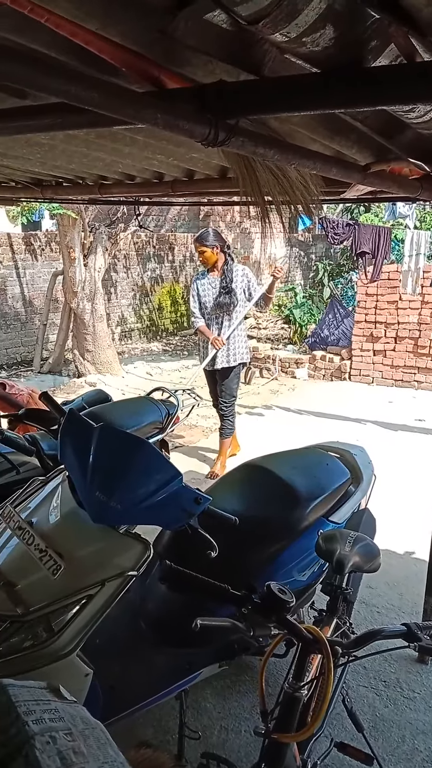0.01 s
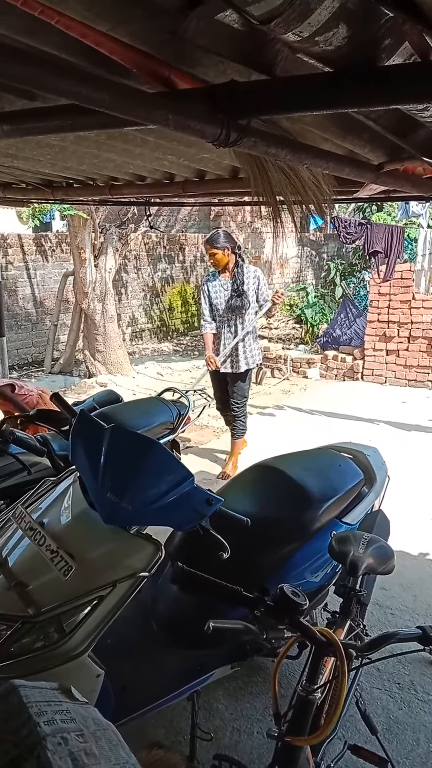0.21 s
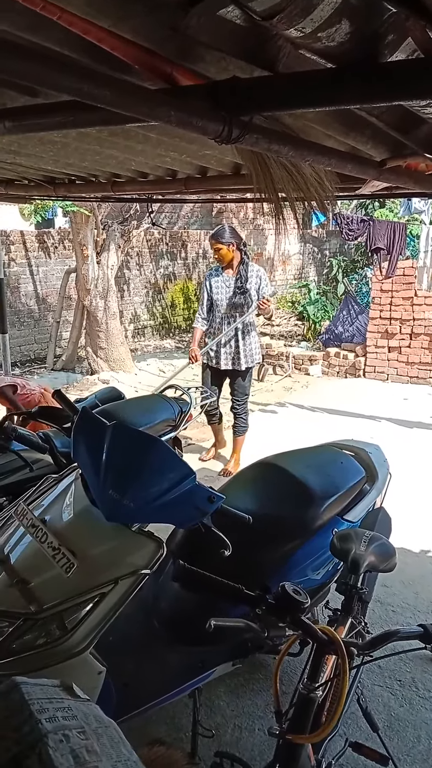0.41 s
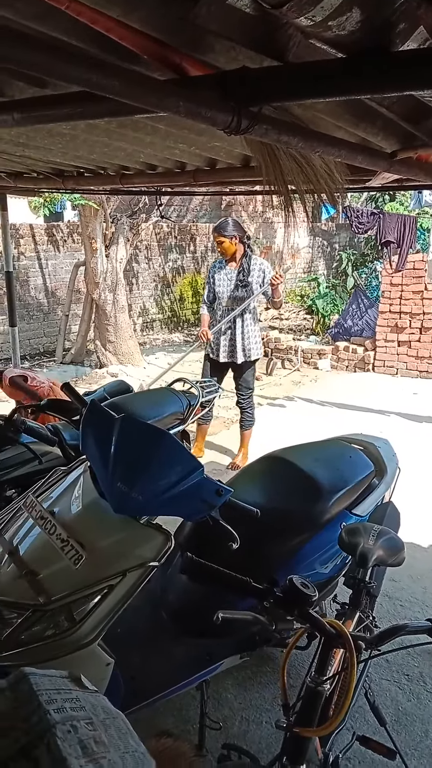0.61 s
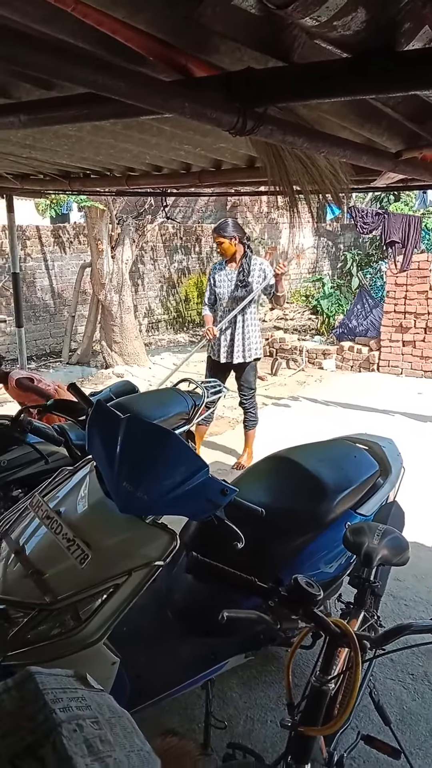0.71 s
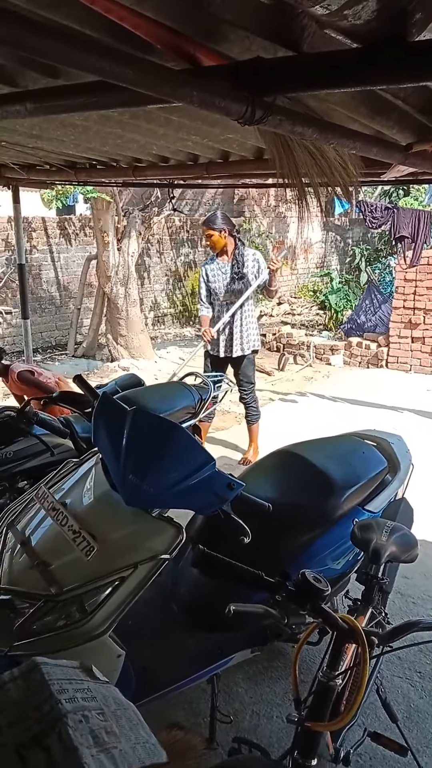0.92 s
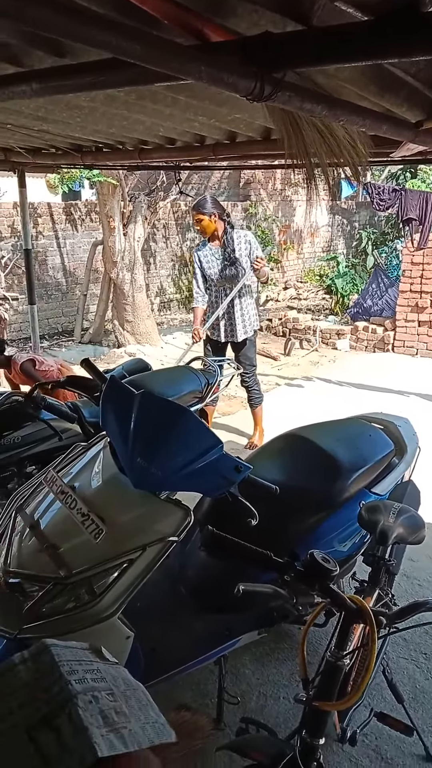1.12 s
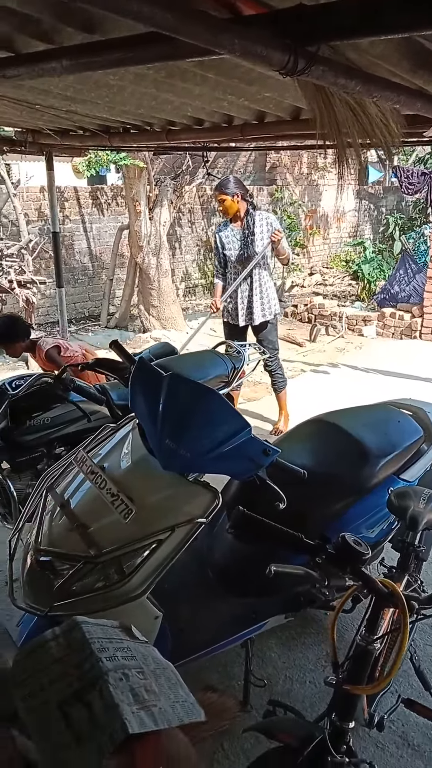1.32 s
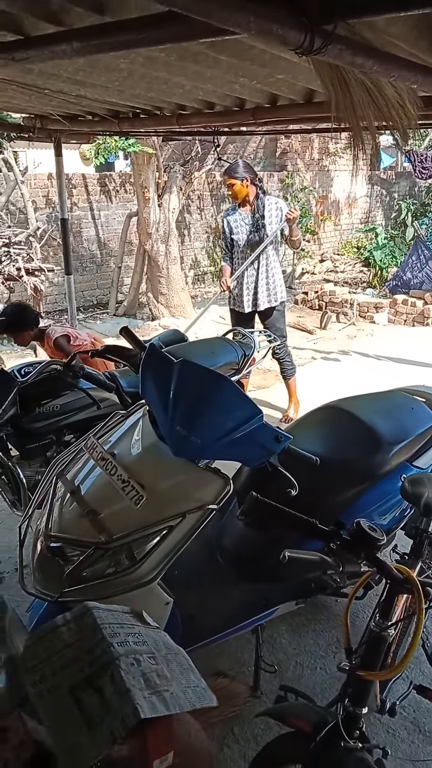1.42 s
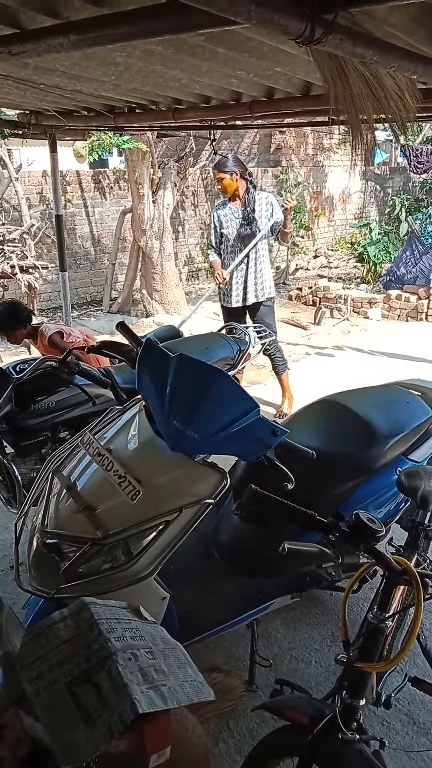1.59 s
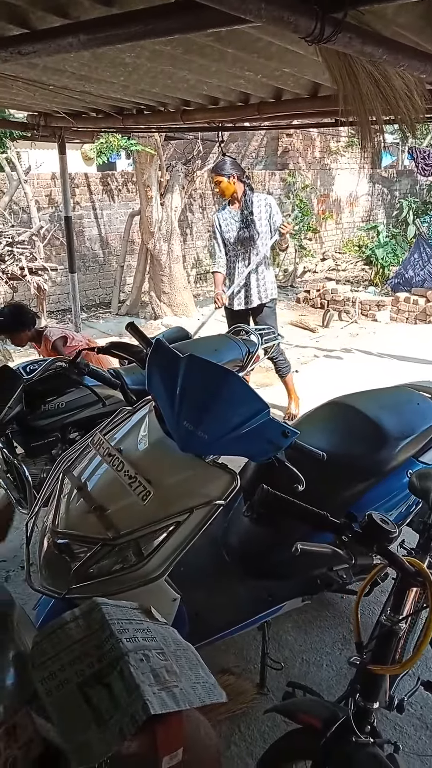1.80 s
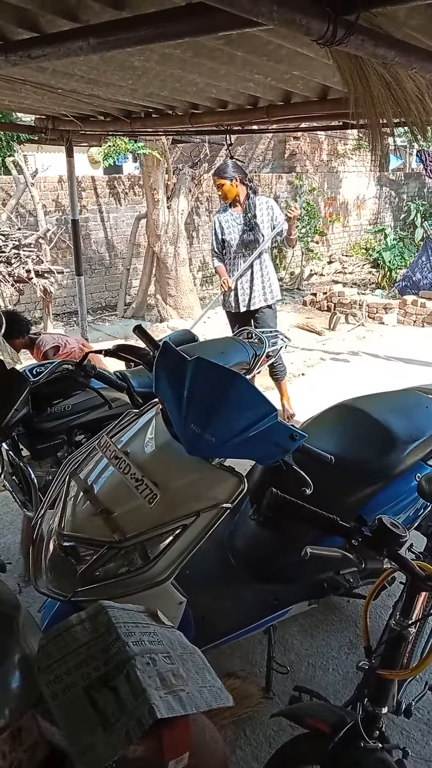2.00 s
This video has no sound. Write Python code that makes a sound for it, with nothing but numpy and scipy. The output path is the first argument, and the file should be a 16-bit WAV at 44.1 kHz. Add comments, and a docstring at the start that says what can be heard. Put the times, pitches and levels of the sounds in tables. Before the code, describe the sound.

Broom sweeping hard ground, two long harsh strokes and lighter brushes, a twig knock, birds chirping faintly.

```python
"""A low uneven rumble and quiet outdoor air, both shaped noise, lie under a stiff broom sweeping a paved yard.
Two faint whistles, a chirp's fading echoes, open it; a long stroke of bristle noise follows, and over it come
a bird's falling chirps and a farther one's hollow notes, all gliding tones. Lighter brushing, thin twitters of
other birds, a second long stroke with a brief hum, and a sharp twig knock come next; then more light brushing,
twitters and a second hum. Walls and a shed roof echo them."""
import sys
import numpy as np
from scipy import signal
from scipy.fft import rfft, irfft
from scipy.io import wavfile
from scipy.ndimage import uniform_filter1d

SR = 44100
rng = np.random.default_rng(int(sys.argv[2]) if len(sys.argv) > 2 else 0)


def transcribe(u):
    """Save the signal u as a 16-bit wav file named by the first command-line argument.

    u: samples, shape (n,) or (channels, n), limited to [-1, 1]; the rate is SR.
    q: integer samples, one column per channel.
    """
    v = np.clip(np.atleast_2d(u).T, -1, 1)
    q = np.round(v * 32767).astype(np.int16)
    wavfile.write(sys.argv[1], SR, q)


N = 88200
T = np.arange(N) / SR

# Spectra below hold pitch_hz, level_db per Hz; only their shape counts, as each noise is set to its own level.
# Level of the rumble over time: start_s, level_db
RUMBLE_LEVEL = [(0, -88), (.2, -83), (.25, -68.5), (.3, -69), (.335, -49), (.4, -65), (.46, -55),
                (.55, -63.5), (.77, -65), (1.0, -55.5), (1.08, -68), (1.14, -57.5), (1.33, -72.5),
                (1.39, -45.5), (1.44, -52), (1.51, -58.5), (1.66, -59), (1.75, -75), (1.82, -61),
                (2.0, -64.5)]
# Spectrum of the rumble: pitch_hz, level_db
RUMBLE_SPECTRUM = [(20, -68), (45, -17), (70, -8.5), (92, 2), (140, 2.5), (200, -14), (260, -29),
                   (500, -34.5), (1000, -78)]
# Spectrum of the outdoor air: pitch_hz, level_db
AIR_SPECTRUM = [(120, -6), (300, 4), (600, -4.5), (1400, 4.5), (2300, -12), (4000, -20), (9000, 3),
                (15500, -37)]
# Time the yard's echoes take to fall 60 dB: pitch_hz, decay_s
YARD_DECAY = [(200, 0.37), (1000, 0.21), (3000, 0.18), (6000, 0.15), (15000, .15)]
# Brief low hums: start_s, length_s, pitch_hz, level_db, octave_db (upper octave against the hum)
HUMS = [(1.205, 0.148, 203.8, -68, 4), (1.86, 0.15, 146.3, -61.5, -27)]
# Faint thin whistles: two fading echoes of an earlier chirp at the start, then twitters of other birds:
# start_s, length_s, first_hz, last_hz, peak_db
FAINT_WHISTLES = [(-.02, 0.047, 2530, 2410, -72.5), (-.02, 0.041, 3490, 3460, -71.5),
                  (0.746, 0.06, 4100, 4090, -65), (1.059, 0.048, 2390, 2230, -61.5),
                  (1.684, 0.057, 5320, 5550, -55), (1.722, 0.042, 5900, 5590, -56.5)]
# Hollow notes of the far bird and their weak after-pulses:
# start_s, length_s, pitch_hz, level_db, rise_s, dip_db (in the middle; negative swells)
HOLLOW_NOTES = [(0.416, 0.095, 698.5, -50, 0.026, 7), (0.511, 0.024, 656, -62, 0.015, -3),
                (0.584, 0.099, 693, -79, 0.046, 7), (0.958, 0.092, 696, -55, 0.067, 1.5),
                (1.485, 0.11, 695.6, -55, 0.022, 3.5), (1.589, 0.054, 698, -69.5, 0.0065, 5),
                (1.692, 0.064, 696, -69.5, 0.025, 1)]
# Falling chirps, a sagging whistle and then a louder drop:
# start_s, hold_s, drop_s, top_hz, knee_hz, end_hz, hold_peak_db, drop_peak_db
CHIRPS = [(.25, 0.079, 0.049, 3855, 3420, 3246, -51, -39),
          (0.802, 0.092, 0.04, 3738, 3230, 2576, -55.5, -49),
          (1.157, 0.14, 0.038, 4065, 3585, 2533, -50.5, -44),
          (1.661, .079, 0.039, 3946, 3614, 2696, -51.5, -43.5)]
# Knocks of a twig on the ground: start_s, peak_db
KNOCKS = [(1.4861, -24.5)]
# One table per broom stroke: time_s, hiss_db (bristles), scrape_db (lower scrape)
STROKES = [
    [(.1, -84, -96), (.125, -72.5, -96), (.145, -51, -72), (.18, -45.5, -59.5), (.24, -40, -50),
     (.31, -36, -49.5), (.345, -30, -45), (.41, -27.5, -42.5), (.5, -36, -45.5), (.58, -53, -61),
     (.66, -64, -77.5), (.71, -76.5, -107)],
    [(.828, -71, -86), (.841, -50.5, -77), (.885, -53, -62.5), (.915, -46, -62), (.945, -45.5, -63),
     (.988, -78, -87)],
    [(1.068, -65, -76), (1.086, -53.5, -64), (1.13, -45.5, -51.5), (1.175, -48, -52), (1.23, -35, -49.5),
     (1.28, -29.5, -43.5), (1.345, -36, -46.5), (1.42, -34, -47), (1.49, -44.5, -50.5),
     (1.53, -51.5, -65.5), (1.58, -58.5, -89)],
    [(1.56, -85, -84), (1.605, -50, -70.5), (1.635, -50.5, -61), (1.665, -46, -59), (1.7, -58.5, -71),
     (1.73, -81, -73.5)],
    [(1.8, -65, -78), (1.83, -59, -66.5), (1.85, -47, -61.5), (1.885, -45, -52), (1.935, -49.5, -59),
     (1.99, -43.5, -56.5), (2.02, -46, -46)],
]
# Spectrum of the bristle hiss, pressed hard: pitch_hz, level_db
PRESSED_HISS = [(1800, -39), (2300, -13.5), (2900, -8.5), (3350, 1.5), (3750, -7), (4150, -11), (4800, -1),
                (5400, 1), (7200, -2.5), (8500, -7), (10500, -11.5), (12500, -8.5), (14800, -3),
                (15600, -2)]
# Spectrum of the bristle hiss, brushing lightly: pitch_hz, level_db
LIGHT_HISS = [(2000, -60), (2350, -16), (2600, -23), (2900, -15.5), (3350, -3.5), (3750, -11.5),
              (4200, -18.5), (4800, -3), (5400, -2), (7200, -7), (8500, -13), (10500, -17), (12500, -14),
              (14800, -8.5), (15600, -12.5)]
# Spectrum of the scrape, pressed hard: pitch_hz, level_db
PRESSED_SCRAPE = [(150, -43), (400, -25.5), (560, -35.5), (780, -27), (1000, -3), (1200, -4), (1450, -1),
                  (1700, 2.5), (2050, -6.5), (2600, -12.5), (4000, -32)]
# Spectrum of the scrape, brushing lightly: pitch_hz, level_db
LIGHT_SCRAPE = [(150, -24), (400, -19.5), (700, -24), (1000, -16), (1200, -6.5), (1450, 0), (1700, 3),
                (2000, -8.5), (2600, -6.5), (4000, -19)]
# Dull drag of the broom head when it lies flat: start_s, length_s, level_db
DRAGS = [(1.096, 0.33, -62.5), (1.82, 0.17, -72.5)]
# Spectrum of the drag: pitch_hz, level_db
DRAG_SPECTRUM = [(120, -11), (200, 14.5), (290, 0), (420, -9), (620, 7.5), (900, -11), (1400, -43)]

AIR_DB = -78.5
# Pitch wavers are rms fractions of the pitch; room levels are the echoes against the dry sound.
HUM_WAVER, HUM_RISE_HZ_PER_S, HUM_ROOM_DB = 0.056, 49, -7
WHISTLE_WAVER, WHISTLE_ROOM_DB = 0.009, -5
NOTE_WAVER, NOTE_SAG_HZ_PER_S, NOTE_FALL_S, NOTE_ROOM_DB = 0.006, 78, 0.018, -14.5
HOLD_WAVER, DROP_WAVER, DROP_SWELL_S = 0.003, 0.008, 0.0036
CHIRP_BEND, CHIRP_RISE_S, CHIRP_FALL_S = 1.8, 0.024, 0.0059
CHIRP_ROOM_DB, CHIRP_ECHOES_PER_S = -1, 580  # strong but sparse echoes
KNOCK_BAND_HZ, KNOCK_RING_S, KNOCK_RING_DB, KNOCK_ROOM_DB = (3200, 5900), 0.008, -24, -3
FLICKS_PER_S, FLICK_SPREAD_DB, FLICK_LIMIT = 3400, 1, 3.5  # limit in multiples of the spread
FLICK_SHARE = 0.55  # part of the friction's power; the rest is fine dust hiss
TWIG_COUNT, TWIG_WIDTH_HZ, TWIG_DB = 90, 220, -6  # level against the friction
FINE_SHARE, FINE_ABOVE_HZ = 0.68, 13200  # the top of the hiss is mostly smooth dust
PATCH_DB, PATCH_HZ, PATCH_S = 3, 450, 0.035
PRESSED_DB, LIGHT_DB = -40.5, -44  # hiss levels that count as fully pressed and fully light
STROKE_EDGE_S, BROOM_ROOM_DB = 0.02, -9
EDGE_HZ = 15650


def amp(db):
    """Turns decibels into gain."""
    return 10 ** (np.asarray(db) / 20)


def unit(x):
    """Scales a sound to rms 1."""
    return x / np.sqrt(np.mean(x ** 2) + 1e-20)


def read(points, hz):
    """Reads a curve between its points on a log-frequency axis."""
    point_hz, value = np.transpose(points)
    return np.interp(np.log(hz + 1), np.log(point_hz), value)


def colour(x, points):
    """Filters a sound by a spectrum."""
    hz = np.fft.rfftfreq(len(x), 1 / SR)
    return irfft(rfft(x) * amp(read(points, hz)), len(x))


def add(mix, start_s, sound):
    """Lays a sound into the mix, cutting whatever falls outside it."""
    at = round(start_s * SR)
    sound = sound[max(-at, 0):]
    part = mix[max(at, 0):][:len(sound)]
    part += sound[:len(part)]


def gate(t, length, rise, fall):
    """Smooth attack, hold and release."""
    ramp = np.minimum(t / rise, (length - t) / fall)
    return np.sin(np.pi / 2 * np.clip(ramp, 0, 1)) ** 2


def waver(size, order):
    """Random wobble smoothed over order samples, rms 1 over the whole scene."""
    return unit(uniform_filter1d(rng.standard_normal(N), order))[:size]


def glide(hz):
    """Running phase of a tone whose pitch changes."""
    return 2 * np.pi * np.cumsum(hz) / SR


def yard(x, room_db, echoes_per_s=2500):
    """The dry sound plus scattered echoes from walls and roof, decaying at a rate set by pitch."""
    size = SR // 2
    hits = rng.random(size) < echoes_per_s / SR
    late = np.arange(size) > 0.004 * SR
    echoes = rng.standard_normal(size) * hits * late
    hz, t, bands = signal.stft(echoes, SR, nperseg=256)
    decay = amp(-60 * t / read(YARD_DECAY, hz)[:, None])
    tail = signal.istft(bands * decay, SR, nperseg=256)[1]
    tail *= amp(room_db) / np.linalg.norm(tail)
    tail[0] += 1  # the direct sound
    return signal.fftconvolve(x, tail)


def background():
    """Uneven low rumble and quiet outdoor air, two shaped noises."""
    rumble = unit(colour(rng.standard_normal(N), RUMBLE_SPECTRUM))
    rumble *= amp(np.interp(T, *np.transpose(RUMBLE_LEVEL)))
    air = amp(AIR_DB) * unit(colour(rng.standard_normal(N), AIR_SPECTRUM))
    return rumble + air


def hum(length, pitch_hz, level_db, octave_db):
    """A brief hum, wavering and rising, with its upper octave."""
    t = np.arange(0, length, 1 / SR)
    hz = pitch_hz * (1 + HUM_WAVER * waver(len(t), order=400))
    phase = glide(hz + HUM_RISE_HZ_PER_S * (t - length / 2))
    tone = np.sin(phase) + amp(octave_db) * np.sin(2 * phase)
    level = np.sqrt(2) * amp(level_db) * gate(t, length, rise=0.027, fall=0.041)
    return yard(level * tone, HUM_ROOM_DB)


def faint_whistle(length, first_hz, last_hz, peak_db):
    """A short unsteady whistle gliding from one pitch to another."""
    t = np.arange(0, length, 1 / SR)
    hz = first_hz + (last_hz - first_hz) * t / length
    hz *= 1 + WHISTLE_WAVER * waver(len(t), order=60)
    level = amp(peak_db) * gate(t, length, rise=0.017, fall=0.016)
    return yard(level * np.sin(glide(hz)), WHISTLE_ROOM_DB)


def hollow_note(length, pitch_hz, level_db, rise, dip_db):
    """A nearly pure, slightly sagging note that swells, may dip in the middle, and fades."""
    t = np.arange(0, length, 1 / SR)
    hz = pitch_hz * (1 + NOTE_WAVER * waver(len(t), order=700))
    phase = glide(hz - NOTE_SAG_HZ_PER_S * (t - length / 2))
    level = amp(level_db - dip_db * np.sin(np.pi * t / length) ** 12)
    level *= np.sqrt(2) * gate(t, length, rise, NOTE_FALL_S)
    return yard(level * np.sin(phase), NOTE_ROOM_DB)


def chirp(hold, drop, top_hz, knee_hz, end_hz, hold_db, drop_db):
    """A clean whistle swells and sags slowly, then plunges, louder, and levels out."""
    t = np.arange(0, hold + drop, 1 / SR)
    sag = np.minimum(t / hold, 1) ** CHIRP_BEND
    plunge = np.sin(np.pi / 2 * np.clip((t - hold) / drop, 0, 1)) ** 2
    hz = top_hz + (knee_hz - top_hz) * sag + (end_hz - knee_hz) * plunge
    force = np.clip((t - hold) / DROP_SWELL_S + 0.5, 0, 1)  # 0 in the hold, 1 in the drop
    depth = HOLD_WAVER + force * (DROP_WAVER - HOLD_WAVER)
    hz *= 1 + depth * waver(len(t), order=90)
    level = amp(hold_db + (drop_db - hold_db) * force)
    level *= gate(t, hold + drop, CHIRP_RISE_S, CHIRP_FALL_S)
    return yard(level * np.sin(glide(hz)), CHIRP_ROOM_DB, CHIRP_ECHOES_PER_S)


def knock(peak_db):
    """A hard tick and a faint decaying rattle, held to one band, and their echoes."""
    t = np.arange(2048) / SR
    blow = rng.standard_normal(len(t)) * amp(KNOCK_RING_DB) * np.exp(-t / KNOCK_RING_S)
    blow[0] += 1
    band = signal.butter(2, KNOCK_BAND_HZ, "bandpass", fs=SR, output="sos")
    tick = signal.sosfilt(band, blow)
    return yard(amp(peak_db) * tick / abs(tick).max(), KNOCK_ROOM_DB)


def flicks(rate):
    """Random slips of bristle tips as single clicks, a few somewhat stronger than the rest."""
    strength = np.minimum(rng.exponential(1, N), FLICK_LIMIT)
    clicks = rng.choice([-1, 1], N) * (rng.random(N) < rate / SR)
    return unit(amp(FLICK_SPREAD_DB * strength) * clicks)


def friction():
    """Bristle slips over the fine hiss of dust."""
    dust = rng.standard_normal(N)
    return np.sqrt(FLICK_SHARE) * flicks(FLICKS_PER_S) + np.sqrt(1 - FLICK_SHARE) * dust


def twigs(count):
    """Single twigs ring briefly, each at its own pitch, as they are flicked."""
    t = np.arange(2048) / SR
    decay = np.exp(-np.pi * TWIG_WIDTH_HZ * t)
    total = np.zeros(N)
    for hz in rng.uniform(988, 8002, count):
        ring = decay * np.sin(2 * np.pi * hz * t)
        total += signal.oaconvolve(flicks(FLICKS_PER_S / count), ring)[:N]
    return unit(total)


def soften(x):
    """Blends smooth dust hiss into the top of the friction."""
    hz = np.fft.rfftfreq(N, 1 / SR)
    share = FINE_SHARE / (1 + np.exp((FINE_ABOVE_HZ - hz) / 500))
    dust = rfft(rng.standard_normal(N))
    return irfft(np.sqrt(1 - share) * rfft(unit(x)) + np.sqrt(share) * dust, N)


def patchy(x):
    """Tufts of bristles catch and let go: narrow bands swell and fade at random."""
    bands = signal.stft(x, nperseg=512, noverlap=384)[2]
    field = rng.standard_normal(bands.shape)
    field = uniform_filter1d(field, round(PATCH_HZ * 512 / SR), axis=0)
    field = uniform_filter1d(field, round(PATCH_S * SR / 128), axis=1)
    return signal.istft(bands * amp(PATCH_DB * unit(field)), nperseg=512, noverlap=384)[1][:N]


def stroke_gains(stroke):
    """Gains of hiss and scrape; they die away quickly outside the stroke."""
    time_s, *levels = np.transpose(stroke)
    outside = np.maximum(time_s[0] - T, 0) + np.maximum(T - time_s[-1], 0)
    gains = np.array([amp(np.interp(T, time_s, db)) for db in levels])
    return gains * np.exp(-outside / STROKE_EDGE_S)


def press_colour(x, press, pressed, light):
    """Crossfades a patchy light-brushing colour into the pressed one."""
    hard = unit(colour(x, pressed))
    soft = unit(colour(patchy(x), light))
    return press * hard + (1 - press) * soft


def drags():
    """Dull friction noise that swells and fades as the broom head lies flat."""
    level = sum(amp(db) * gate(T - s, length, length / 2, length / 2) for s, length, db in DRAGS)
    return level * unit(colour(friction(), DRAG_SPECTRUM))


def broom():
    """Friction under each stroke; its colour fills out as the broom is pressed."""
    hiss, scrape = sum(stroke_gains(stroke) for stroke in STROKES)
    press = np.clip((20 * np.log10(hiss) - LIGHT_DB) / (PRESSED_DB - LIGHT_DB), 0, 1)
    tips = soften(friction() + amp(TWIG_DB) * twigs(TWIG_COUNT))
    bristles = press_colour(tips, press, PRESSED_HISS, LIGHT_HISS)
    ground = press_colour(friction(), press, PRESSED_SCRAPE, LIGHT_SCRAPE)
    return yard(hiss * bristles + scrape * ground + drags(), BROOM_ROOM_DB)[:N]


def scene():
    """Everything is heard from one point, alike in both ears."""
    mix = background() + broom()
    sources = [(hum, HUMS), (faint_whistle, FAINT_WHISTLES), (hollow_note, HOLLOW_NOTES),
               (chirp, CHIRPS), (knock, KNOCKS)]
    for source, table in sources:
        for start_s, *settings in table:
            add(mix, start_s, source(*settings))
    return np.array([mix, mix])


def record(dry):
    """A steep low-pass takes away the extreme treble."""
    lowpass = signal.firwin(1023, EDGE_HZ, window=("kaiser", 9), fs=SR)
    return signal.oaconvolve(dry, lowpass[None], "same")


dry = scene()
out = record(dry)
transcribe(out)
```